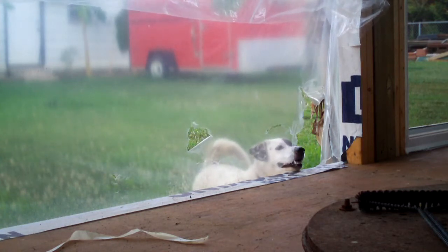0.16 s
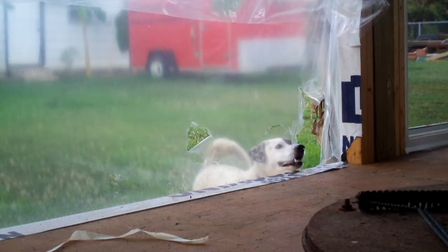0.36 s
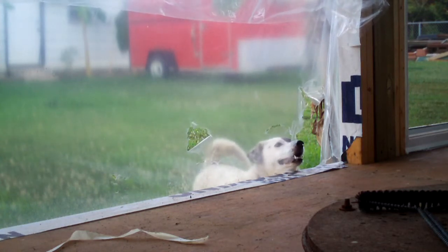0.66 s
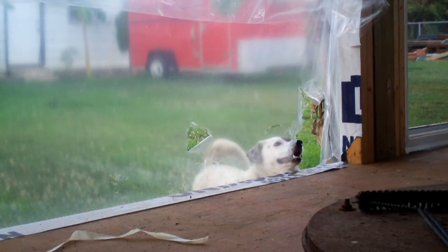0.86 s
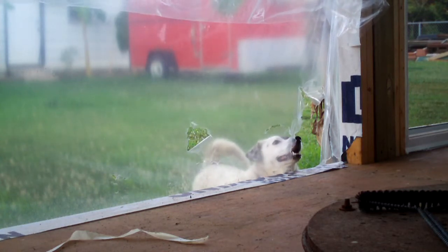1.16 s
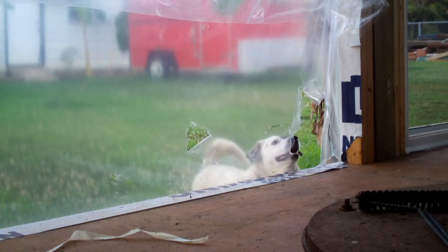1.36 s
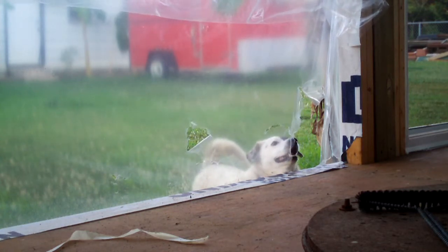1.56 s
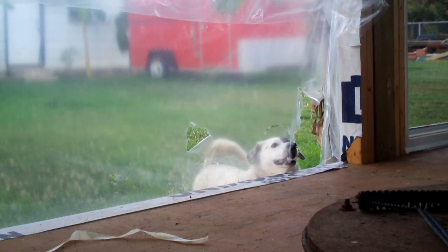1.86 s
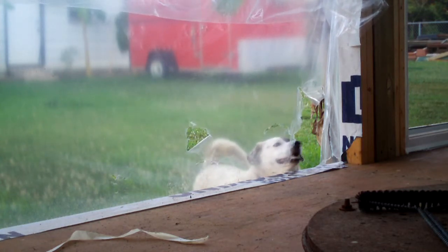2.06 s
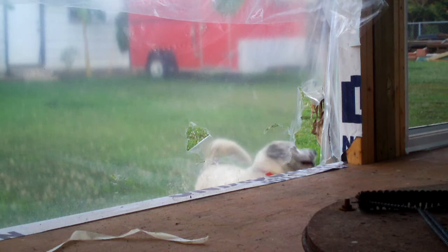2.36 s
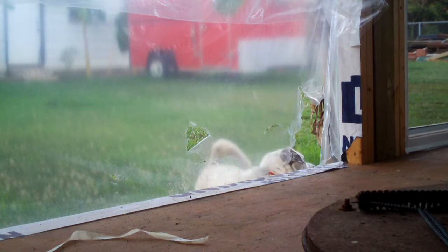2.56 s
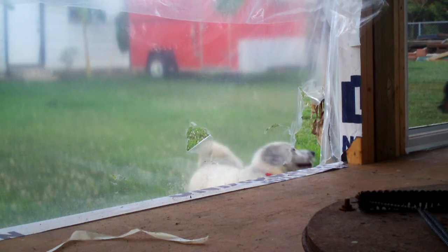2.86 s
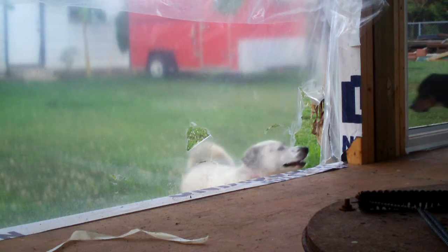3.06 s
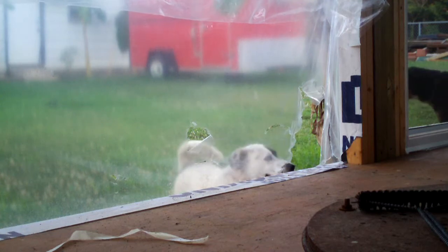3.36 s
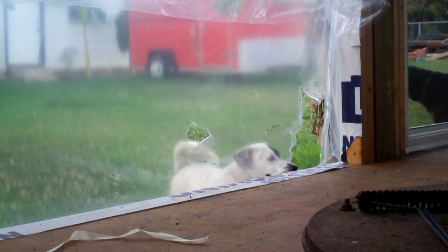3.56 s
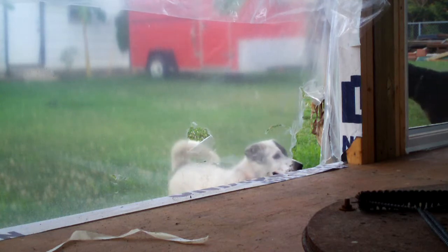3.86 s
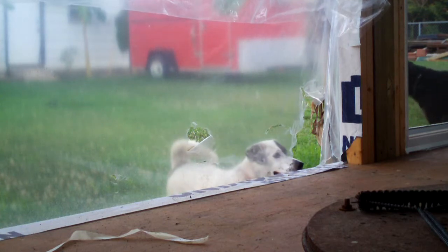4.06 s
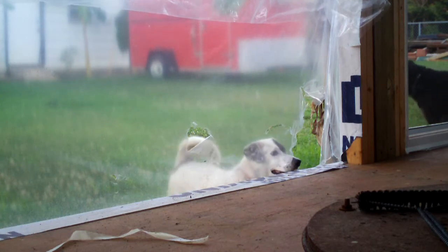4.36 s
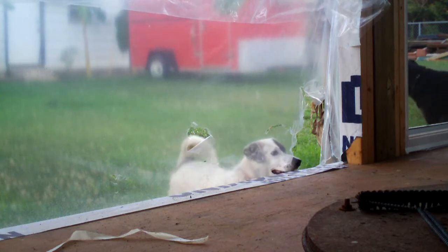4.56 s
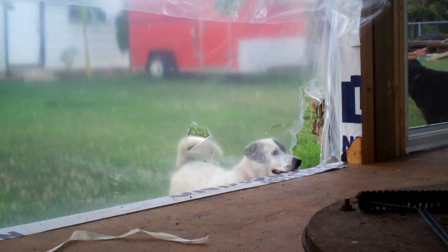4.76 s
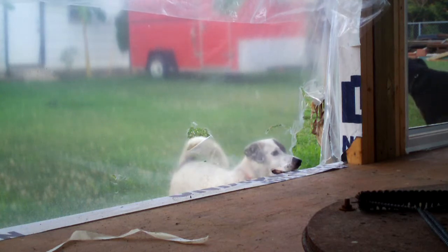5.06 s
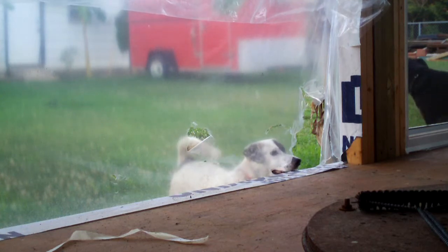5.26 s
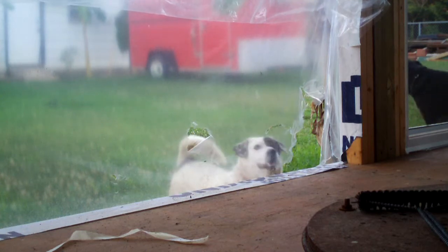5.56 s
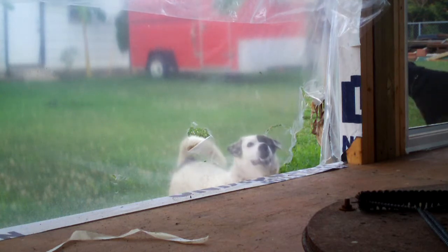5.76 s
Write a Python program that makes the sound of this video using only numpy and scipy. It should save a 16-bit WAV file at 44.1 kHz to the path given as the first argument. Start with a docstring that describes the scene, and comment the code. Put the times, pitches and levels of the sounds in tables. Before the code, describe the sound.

A quiet porch beside a grassy yard, about six seconds. A low distant engine drone is already sounding, sags before 0.7 s, then surges again from 1.6 to 3.3 s and 4.2 to 5.8 s, over boomy traffic rumble and outdoor hush. A dog brushes plastic sheeting in faint short crackles at about 0.35, 0.7, 1.25, 1.55, 1.8 and 2.35 s. A bird's quick, trilled falling whistle stands out at 0.9, 4.2 and 5.8 s, smeared by yard reflections, with weaker ones at 1.8 and 5.3 s. Tiny chirps come at 1.6, 2.4, 3.6, 4.7, 5.3 and 5.7 s. Thin metallic tinks ring at 1.9 and 2.8 s. Soft low air buffets arrive between 2 and 4.3 s; a far vehicle's tyre wash peaks near 3.7 s amid faint wavering tones. High faint ringing swells and fades throughout, beneath bright wide hiss and a thin steady electronic whine.

```python
"""A quiet porch wrapped in plastic sheeting. A bird in the yard repeats a falling whistle, a gliding tone smeared by
reflections from trees and walls; others chirp further off in small arched tones. Narrow bands of noise make a faint
ringing that comes and goes. A dog brushes the sheet in short crackling noise bursts, and two thin metallic tinks
ring out in two modes. Below lie a distant engine, a drone that surges three times, resonant traffic rumble,
soft buffets of air, outdoor hush, a bright wide hiss and a thin electronic whine."""
import sys
import numpy as np
from scipy import signal
from scipy.fft import rfft, irfft
from scipy.io import wavfile

SR = 44100
rng = np.random.default_rng(int(sys.argv[2]) if len(sys.argv) > 2 else 0)


def store_wav(level_fs):
    """Save 16-bit WAV to argv[1]."""
    pcm = np.round(np.clip(np.atleast_2d(level_fs), -1, 1) * 32767)
    wavfile.write(sys.argv[1], SR, pcm.T.astype(np.int16))


N = 260190
TIME = np.arange(N) / SR  # seconds
FREQ = np.maximum(np.arange(N // 2 + 1) * SR / N, 1)  # Hz


def undb(db):
    """Decibels to gain."""
    return 10 ** (np.asarray(db) / 20)


def unit(x):
    """Scale to rms 1."""
    return x / np.sqrt(np.mean(x ** 2))


def noise(gain):
    """Unit noise with the given gain at each frequency."""
    spectrum = rfft(rng.standard_normal(N))
    return unit(irfft(spectrum * gain, N))


def resonance(hz, width):
    """Gain of a band-pass applied twice; the width in Hz is that of a single pass."""
    detuning = (FREQ / hz - hz / FREQ) * hz / width
    return 1 / (1 + detuning ** 2)


def colour(points):
    """Gain at each frequency from (Hz, dB) points, joined along log frequency."""
    hz, db = np.transpose(points)
    return undb(np.interp(np.log(FREQ), np.log(hz), db))


def walk(rate):
    """Smooth random wandering, spread 1, mostly slower than the rate in Hz."""
    return noise(np.exp(-np.minimum(FREQ / rate, 20) ** 2))


def sine(hz):
    """Unit sine that follows a pitch curve from a random phase."""
    cycles = np.cumsum(hz * np.ones(N)) / SR
    return np.sqrt(2) * np.sin(2 * np.pi * (cycles + rng.random()))


def swell(centre, length):
    """A smooth rise and fall around its centre."""
    return np.cos(np.pi * np.clip((TIME - centre) / length, -.5, .5)) ** 2


def hold(start, end, attack_s, release_s):
    """Rise from 0 to 1, hold, and fall back to 0 by the end."""
    rise = (TIME - start) / attack_s
    fall = (end - TIME) / release_s
    return np.clip(np.minimum(rise, fall), 0, 1)


def scatter(x, t60, direct, early_s, early):
    """Direct sound, a dense cluster of reflections that peaks after early_s, and a diffuse tail."""
    t = TIME[:SR]
    near = unit(rng.standard_normal(SR) * t * np.exp(-t / early_s))
    tail = unit(rng.standard_normal(SR) * undb(-60 * t / t60))
    response = (early * near + tail) / np.sqrt(SR)
    response[0] += direct
    return signal.fftconvolve(x, response / np.linalg.norm(response))[:N]


# Surges of the distant engine. Each row: start in seconds, end in seconds, level in dB before the flutter.
SURGES = [(-.1, .74, -39), (1.623, 3.35, -39), (4.156, 5.798, -38.5)]
SURGE_ATTACK_S, SURGE_RELEASE_S = 0.206, 0.264
SURGE_HZ, SURGE_SAG = 45.7, .14  # pitch at full effort, share lost off the throttle
HUM_HZ, HUM_DB = 47.5, -50.5  # the hum that stays between surges, before its waver and flutter


def engine():
    """A low wavering hum; in each surge a drone rises in pitch and level, holds and sags again."""
    out = sine(HUM_HZ * (1 + 0.047 * walk(8.4))) * undb(HUM_DB)
    for start, end, db in SURGES:
        effort = hold(start, end, SURGE_ATTACK_S, SURGE_RELEASE_S)
        pitch = SURGE_HZ * (1 - SURGE_SAG * (1 - effort) + 0.0402 * walk(8.94))
        out += sine(pitch) * effort * undb(db)
    flutter_db = 1.8 * walk(8)
    return out * undb(flutter_db)


# Resonances of the traffic rumble. Each row: centre in Hz, width in Hz, relative gain in dB.
RUMBLE = [(56, 7, -1.5), (70, 21.4, -1), (112.2, 14.3, -1), (133, 48, -20), (178.9, 15.3, -6.5),
          (240.7, 5.9, -8), (290.6, 15.6, -17.5), (438.6, 10.5, -19.5)]
RUMBLE_DB = -48.5  # all resonances together
# Faint far tones. Each row: centre in seconds, length in seconds, mean pitch in Hz, level in dB at the peak.
FAR_TONES = [(2.523, 0.26, 444, -61.5), (3.97, 0.52, 457, -64), (4.096, .14, 570, -59.5),
             (4.597, 0.53, 477, -61)]
# A far vehicle passes: nearest moment, time from there until its power has halved, level of its tyres when nearest
PASS_S, PASS_HALF_S, TYRES_DB = 3.68, 1.87, -62.5


def traffic():
    """Resonant noise for a boomy rumble, a noise band for passing tyres, and a few wavering far tones."""
    modes = sum(undb(db) * resonance(hz, width) for hz, width, db in RUMBLE)
    rumble = noise(modes) * undb(RUMBLE_DB)
    distance = np.hypot(1, (TIME - PASS_S) / PASS_HALF_S)  # 1 when nearest
    wash = noise(resonance(910, 535)) * undb(TYRES_DB) / distance
    tones = np.zeros(N)
    for centre, length, hz, db in FAR_TONES:
        tones += sine(hz * (1 + 0.0099 * walk(26))) * swell(centre, length) * undb(db)
    return rumble + wash + tones


# Colour of the outdoor air. Each row: frequency in Hz, relative density in dB per Hz.
AIR = [(14, 6), (25, 6), (36, -11), (60, -2.5), (130, -12.5), (330, -24), (600, -27), (1100, -32),
       (1600, -32.5), (2400, -39), (3300, -35), (4000, -37.5), (4900, -34.5), (6100, -40), (6900, -47.5),
       (9500, -51.5)]
AIR_DB = -42.5  # the whole hush
# Buffets of air. Each row: centre in seconds, length in seconds, mean pitch in Hz, level in dB at the peak.
BUFFETS = [(2.016, 0.31, 29, -35), (3.1, 0.18, 27.98, -32), (3.709, 0.32, 29.1, -30),
           (4.283, 0.078, 29, -29)]


def air():
    """Steady outdoor hush, with slow pressure swings when a breath of wind arrives."""
    low_cut = np.minimum(FREQ / 12, 1) ** 2
    hush = noise(colour(AIR) * low_cut) * undb(AIR_DB)
    buffets = np.zeros(N)
    for centre, length, hz, db in BUFFETS:
        buffets += sine(hz * (1 + 0.132 * walk(16.9))) * swell(centre, length) * undb(db)
    return hush + buffets


# Partials of the far ringing. Each row: frequency in Hz, relative gain in dB.
SHIMMER_MODES = [(2810, -40), (3030, -4), (3125, -4.5), (3310, -5.5), (3475, 3), (3670, 1.5), (4030, 0)]
# Bursts of the ringing. Each row: start in seconds, level in dB at the end of the attack.
SHIMMERS = [(.27, -63), (1.28, -66), (2.2, -63), (2.82, -66), (3.3, -64.5), (3.549, -66), (4.07, -64.5),
            (4.68, -66), (5.07, -64)]
SHIMMER_ATTACK_S, SHIMMER_T60_S = .06, 1.7


def shimmer():
    """A cluster of narrow noise-like partials far away is set ringing again and again and fades each time."""
    ring = noise(sum(undb(db) * resonance(hz, 22) for hz, db in SHIMMER_MODES))
    gain = np.zeros(N)
    for start, db in SHIMMERS:
        age = np.maximum(TIME - start, 0)
        attack = np.minimum(age / SHIMMER_ATTACK_S, 1)
        fade_db = -60 * np.maximum(age - SHIMMER_ATTACK_S, 0) / SHIMMER_T60_S
        gain += attack * undb(db + fade_db)
    return ring * gain


# Brushes against the sheet. Each row: centre in seconds, length in seconds, band centre in Hz, level in dB.
RUSTLES = [(0.345, 0.18, 330, -54), (0.363, .15, 2170, -64), (.675, 0.1, 1990, -59.5),
           (1.25, .11, 1870, -64.5), (1.535, .11, 2000, -62), (1.56, .07, 4700, -60.5),
           (1.81, 0.19, 5150, -63.5), (2.342, 0.089, 2550, -66)]
RUSTLE_WIDTH = 0.59  # bandwidth as a share of the band centre


def sheet():
    """Each brush lets many tiny creases slip at once: a noise band with a fast random crackle."""
    out = np.zeros(N)
    creases = unit(undb(2.5 * walk(260)))
    for centre, length, hz, db in RUSTLES:
        band = noise(resonance(hz, RUSTLE_WIDTH * hz))
        out += band * creases * swell(centre, length) * undb(db)
    return scatter(out, t60=0.14, direct=3.1, early_s=0.02, early=0.78)


# Falling whistles. Each row: start in seconds, length in seconds, starting pitch in Hz before the trill, level in dB.
WHISTLES = [(0.871, 0.12, 3970, -38), (1.757, .09, 3893, -53.5), (4.215, 0.12, 4020, -39.5),
            (5.288, .045, 3820, -48.5), (5.76, 0.12, 3915, -37)]
# Every whistle falls fast, then flattens: share of its pitch that it loses, and the bend of the fall
SLUR_FALL, SLUR_BEND = .295, 1.4
SLUR_ATTACK, SLUR_RELEASE = 0.45, 0.068  # shares of the length
SLUR_OCTAVE_DB = -29  # octave against the main tone at the start; it fades along the whistle
# Small arched chirps. Each row: start in seconds, length in seconds, top pitch in Hz before the waver,
# share of pitch lost at both ends, level in dB at the middle.
CHIRPS = [(1.566, 0.081, 4300, 0.44, -54.5), (2.373, .056, 3500, 0, -59), (3.589, 0.036, 3650, .1, -61),
          (4.656, 0.061, 3490, 0.08, -55.5), (5.319, 0.065, 3430, .14, -52),
          (5.358, 0.046, 2425, .06, -57.5), (5.722, 0.039, 4560, .1, -60)]
YARD_T60_S, YARD_EARLY_S = .6, .021


def birds():
    """Trilled falling whistles arrive mostly by reflection; the small chirps come more directly."""
    whistles, chirps = np.zeros(N), np.zeros(N)
    trill_rate = 130 * (1 + .15 * walk(60))  # Hz
    trill = 1 + .042 * sine(trill_rate) + .01 * walk(300)
    for start, length, hz, db in WHISTLES:
        left = np.clip(1 - (TIME - start) / length, 0, 1)  # share still to come
        pitch = hz * (1 - SLUR_FALL * (1 - left ** SLUR_BEND)) * trill
        gain = undb(db) * hold(start, start + length, SLUR_ATTACK * length, SLUR_RELEASE * length)
        octave = undb(SLUR_OCTAVE_DB) * left * sine(2 * pitch)
        whistles += (sine(pitch) + octave) * gain
    for start, length, hz, fall, db in CHIRPS:
        u = np.clip(2 * (TIME - start) / length - 1, -1, 1)  # -1 to 1 along the chirp
        pitch = hz * (1 - fall * u ** 2 + .018 * walk(172))
        chirps += sine(pitch) * undb(db) * np.sqrt(1 - u ** 2)
    return (scatter(whistles, t60=YARD_T60_S, direct=0.34, early_s=YARD_EARLY_S, early=0.86)
            + scatter(chirps, t60=YARD_T60_S, direct=1.0, early_s=YARD_EARLY_S, early=.7))


# Touches of the metal. Each row: start in seconds, lower mode in dB, upper mode in dB, both before the ring's envelope.
TINKS = [(1.912, -59, -61), (2.819, -55, -68)]
# Mean pitch of the lower and the upper mode in Hz.
TINK_HZ = [10120, 13400]


def tinks():
    """A small piece of metal is touched and rings in two high, slightly unsteady modes."""
    out = np.zeros(N)
    for start, *levels in TINKS:
        age = np.maximum(TIME - start, 0)
        ring = (1 - np.exp(-age / 0.0013)) * undb(-60 * age / 0.091)  # quick onset, 91 ms decay to -60 dB
        for hz, db in zip(TINK_HZ, levels):
            out += ring * undb(db) * sine(hz * (1 + 0.0057 * walk(300)))
    return scatter(out, t60=.35, direct=1.2, early_s=0.0079, early=0.38)


def scene():
    """Everything reaches both channels alike."""
    mix = engine() + traffic() + air() + shimmer() + sheet() + birds() + tinks()
    return np.tile(mix, (2, 1))


# Colour of the wide hiss. Each row: frequency in Hz, relative density in dB per Hz.
HISS = [(500, -8), (2500, -13.5), (5000, -0.5), (8000, 4.5), (11000, 0), (15000, 0)]
HISS_DB = -68  # each channel, before the top is cut
WHINE_HZ, WHINE_DB = 7870, -71  # mean level; it wavers by about half a dB
TOP_HZ = 15300  # cutoff


def record(dry):
    """A shared thin whine and a bright hiss that differs between the channels are added, then the top is steeply cut."""
    hiss = np.array([noise(colour(HISS)), noise(colour(HISS))]) * undb(HISS_DB)
    whine = sine(WHINE_HZ) * undb(WHINE_DB + .5 * walk(8.9))
    low_pass = signal.ellip(12, .1, 80, TOP_HZ, fs=SR, output="sos")
    return signal.sosfilt(low_pass, dry + hiss + whine)


dry = scene()
out = record(dry)
store_wav(out)
```